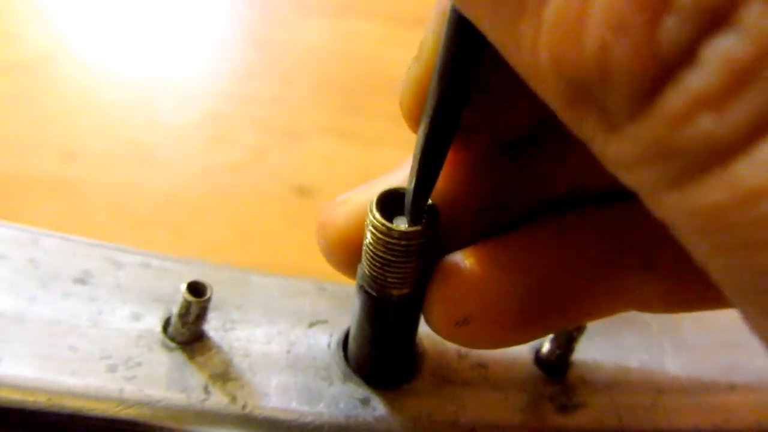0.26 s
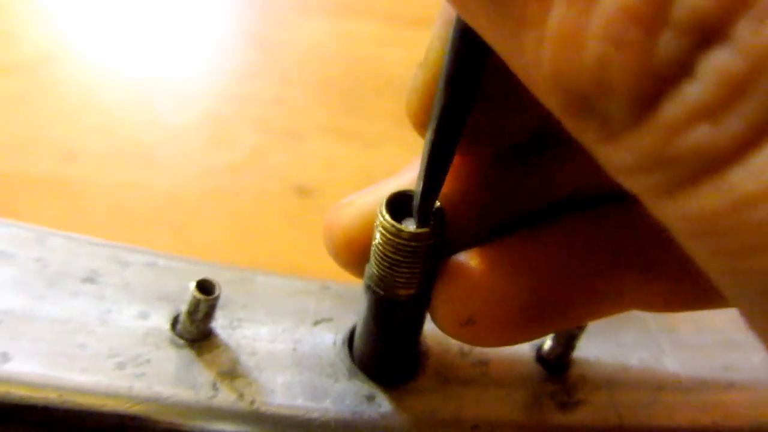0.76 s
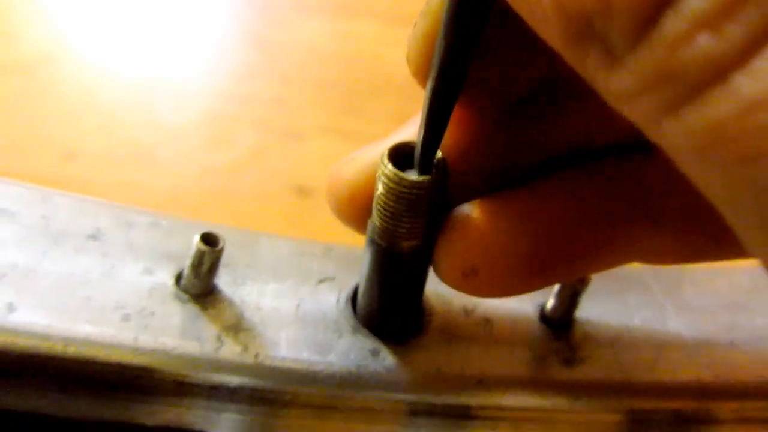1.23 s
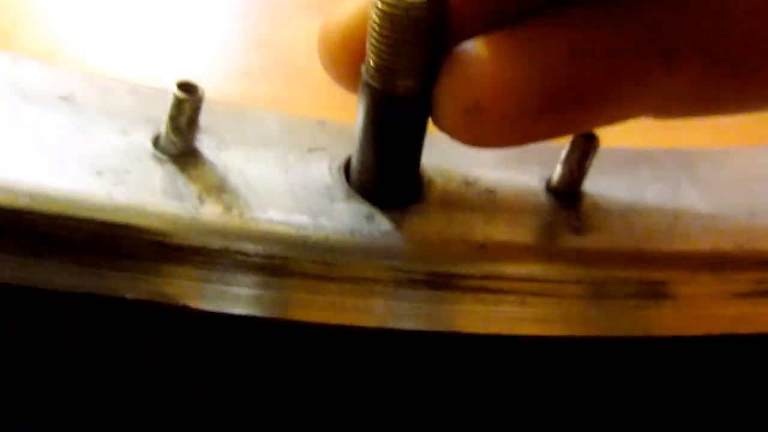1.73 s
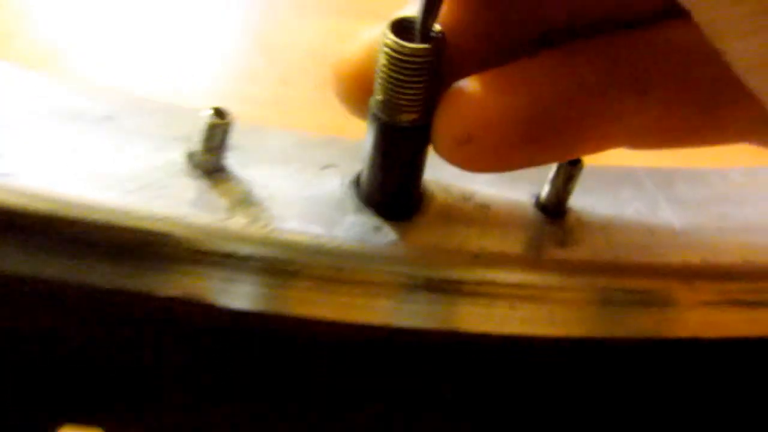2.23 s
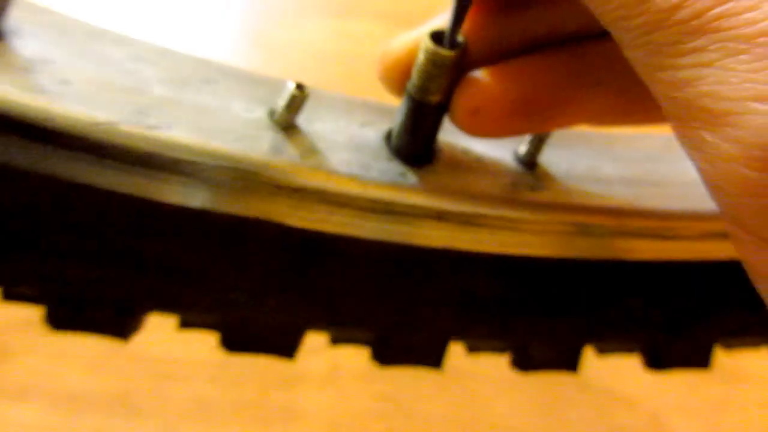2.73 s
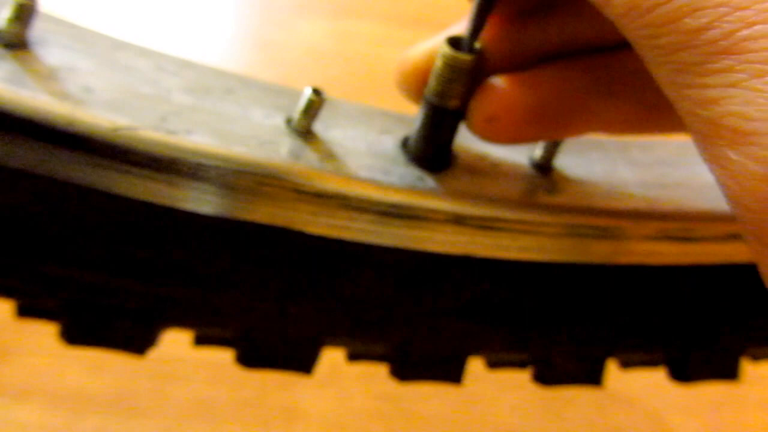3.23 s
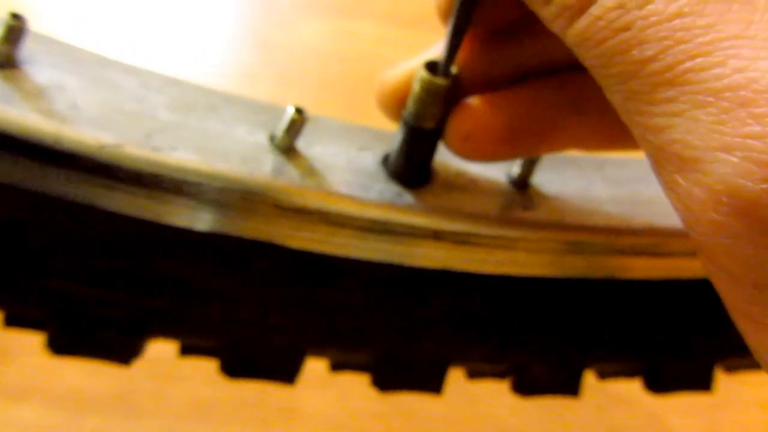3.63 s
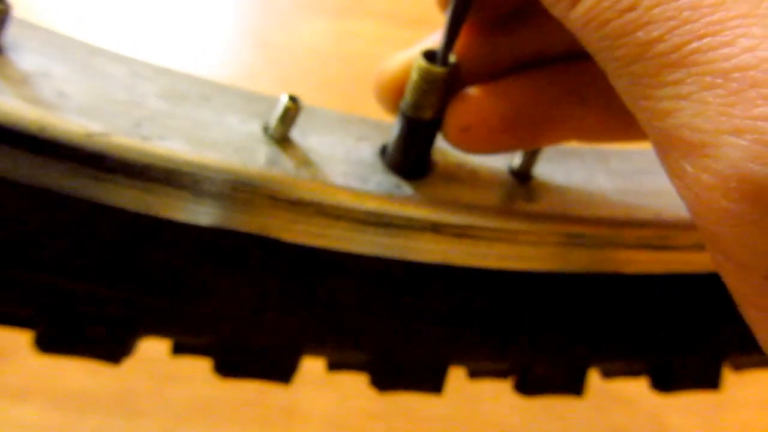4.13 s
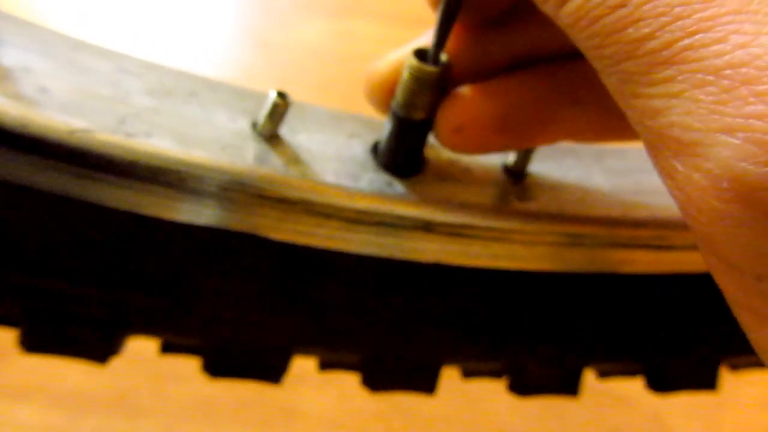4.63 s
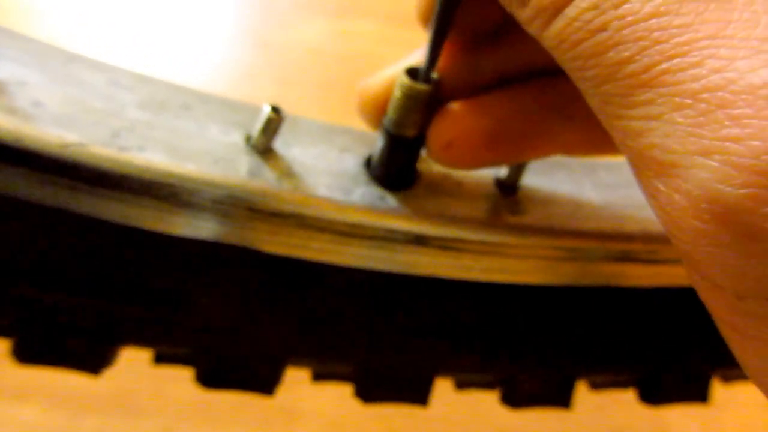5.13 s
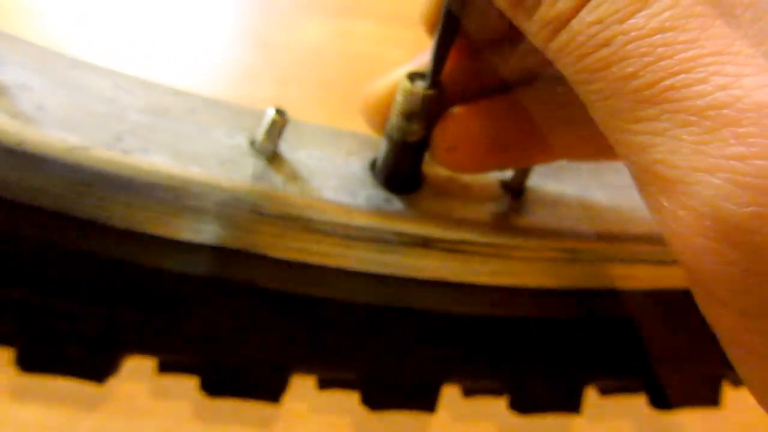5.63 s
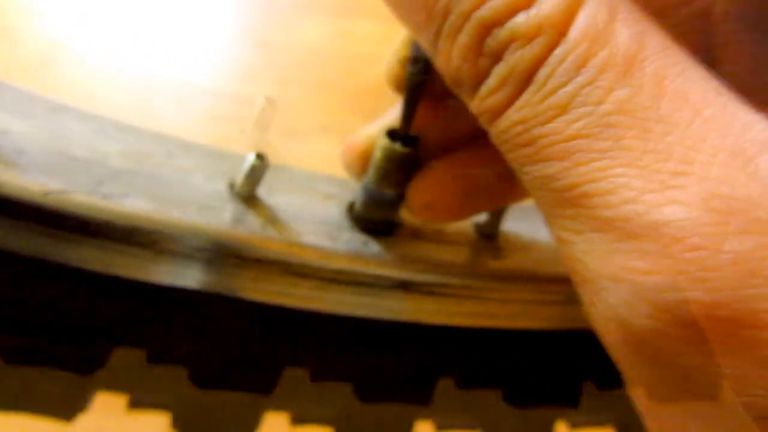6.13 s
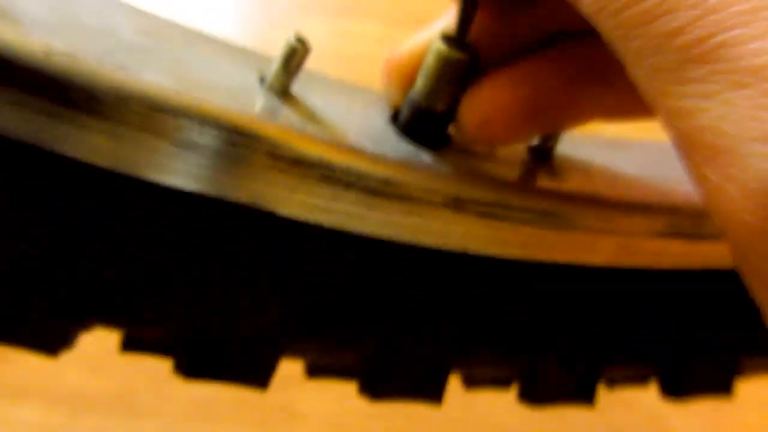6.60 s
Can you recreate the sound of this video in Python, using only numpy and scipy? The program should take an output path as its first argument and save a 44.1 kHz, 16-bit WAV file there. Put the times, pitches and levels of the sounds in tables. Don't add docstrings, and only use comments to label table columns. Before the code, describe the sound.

A continuous, high, fizzing rush of air from a small valve, heard up close indoors. At first heavy wind-like thumps and flutter batter the microphone; after about two seconds they thin to occasional puffs and the hiss dominates, building. A sharp click-like pop stops it for an instant. A softer, hollower leak follows, swelling briefly with faint metallic nudges, then dying down with a last little puff.

```python
import sys
import numpy as np
from scipy import signal
from scipy.fft import rfft, irfft, next_fast_len
from scipy.io import wavfile

SR = 44100
rng = np.random.default_rng(int(sys.argv[2]) if len(sys.argv) > 2 else 0)


def log_audio(samples):
    frames = np.atleast_2d(samples).T
    limited = np.clip(frames, -1, 1)
    pcm = np.round(limited * 32767).astype(np.int16)
    wavfile.write(sys.argv[1], SR, pcm)


def makeup_ratio(level_db):
    decades = np.asarray(level_db, float) / 20
    return 10 ** decades


N = 302658
SIZE = next_fast_len(N, True)
LOG_BINS = np.log(np.arange(SIZE // 2 + 1) * SR / SIZE + 1)

# frequency in Hz, level in dB per Hz.
FLOOR_COLOUR = [(30, -24), (120, -2.5), (300, -8.5), (700, -8), (2000, -25), (4000, -15), (8000, -25),
                (15000, -24)]
FLOOR_DB = -59
ROOM_T60_S, ROOM_DB, WALL_CUT_HZ = .7, -26, 5300

# time in seconds, hiss in dB.
JET_LEVEL = [(0.0, -31), (0.5, -31.5), (1.24, -31.5), (1.28, -33.3), (1.55, -32.5), (1.83, -30.5),
             (4.14, -24.5), (5.09, -23), (5.5, -22), (5.57, -52), (5.6, -45), (5.635, -33), (5.76, -32.5),
             (5.91, -29), (6.15, -27.5), (6.49, -29.5), (6.7, -35.5), (6.86, -40)]
# time in seconds, pose.
POSE = [(0, 0.0085), (1.2, 0.083), (2.0, 0.34), (3.0, 0.5), (4.0, 0.72), (4.7, 0.9), (5.502, 0.86),
        (5.506, 1.8), (5.75, 2.14), (5.95, 2.83), (6.3, 2.97), (6.5, 3.15), (6.65, 3.6), (6.86, 3.8)]
# time in seconds, open share 0-1.
VALVE_OPEN = [
    (0, 1),
    (5.5029, 1),
    (5.5037, 0),
    (5.57, 0),
    (5.6, 1),
    (6.86, 1),
]
SEEP_DB = -51.5
# time in seconds, share lost 0-1.
FINGER_SHADE = [(0, 0), (5.18, 0), (5.22, .5), (5.52, .5), (5.54, 0), (6.86, 0)]
SHADE_HZ = 12300
# frequency in Hz, level in dB per Hz.
SUM_HELD = [
    [(3000, -8), (3900, -6.5), (4620, -2), (5020, -0.5), (5990, 0.8), (7720, -2), (8490, -3.5),
     (10300, -7.5), (11000, -12), (12000, -20), (14300, -13.5), (15600, -10)],
    [(2240, -31), (3800, -19), (3960, -24.5), (4590, -13.5), (5200, -9.5), (5920, -12.5), (6740, -11.5),
     (7770, -8.5), (8640, -1), (9220, 0), (11200, -6), (12200, -9.5), (14200, -8.5), (14800, -13),
     (15600, -26)],
]
# frequency in Hz, level in dB per Hz.
SUM_LEAK = [
    [(2240, -22), (3800, -18), (5080, -11), (5480, -5.5), (6240, -10), (6700, -8), (8440, -13), (8790, -11),
     (10200, -4), (11600, -17), (13300, -17), (15600, -23)],
    [(2240, -27), (3800, -17), (4250, -8), (4700, -3), (5650, -5.5), (6170, -9.5), (7860, -10),
     (8640, -15.5), (9550, -9.5), (10200, -7.5), (10800, -9), (12000, -22), (13600, -17), (15600, -22)],
    [(2240, -66), (3800, -34), (4150, -12), (4560, -4), (4870, -9), (5290, -20), (5750, -23), (8240, -23),
     (8740, -18), (10400, -23), (12500, -35), (13900, -17), (15600, -46)],
]
SUM = SUM_HELD + SUM_LEAK
# frequency in Hz, level in dB per Hz.
DIFFERENCE = [
    [(2240, -40), (3800, -11), (5820, -1.5), (6980, -3), (8190, -6), (8850, -9), (11100, -13), (12000, -19),
     (13400, -22), (14400, -13), (15600, -18)],
    [(2240, -48), (3800, -21), (4460, -21), (5260, -6), (6280, -5), (7770, 3.5), (11100, -3.5),
     (12000, -10), (13200, -5), (15600, -17)],
    [(2240, -54), (3800, -14), (4430, -23), (5260, -2), (6240, -7), (7770, -2), (10100, -7), (11700, -17),
     (13400, -15), (15600, -22)],
    [(2240, -49), (3800, -19), (4510, -13), (5140, -4), (5480, 1), (6210, -10), (7590, -2), (8440, -11),
     (9610, -6), (11500, -19), (13300, -16), (14400, -20), (15600, -20)],
    [(2240, -64), (3800, -34), (4180, -24), (4460, -19), (6740, -28), (7810, -6), (8850, -4), (9780, 1),
     (11300, -5), (12800, -32), (13100, -18), (14100, -17), (15600, -33)],
]
# level in dB, by pose.
DIFFERENCE_DB = [-2, -1.5, -1.5, -2.5, -0.3]
# frequency in Hz, shared part 0-1,
# phase of the difference in radians.
COHERENCE = [(3000, .4, 3.5), (4400, 0.3, 2.2), (5360, 0.87, 2.27), (6960, 0.5, 0.93), (8250, 1, 1.56),
             (10000, 1, 1.2), (12000, .8, 1.6), (15000, .75, 1.1)]
# time in seconds, left minus right of the jet in dB, of the stream in dB.
LEAN = [(0, -1.5, -0.2), (1.4, 0, -.3), (2.16, -0.8, 1), (2.5, -1.3, -1.5), (4, -1.5, -2.5),
        (5.6, -2.6, -4), (5.96, -.3, -1), (6.65, -3.5, 0), (6.86, -3, -3)]

# time in seconds, strength in dB, aim at the ports 0-1,
# share coming as lone pops 0-1.
STREAM = [(0, 6.5, 0.22, 0.13), (.5, 4, 0.79, 0.41), (1.0, 1.3, 0.99, 0.58), (1.4, -1, 1, 0.52),
          (1.9, 0.4, 0.98, 0.53), (2.26, -0.5, 0.87, 0.8), (2.37, 0.15, 0.04, .3), (3.3, -1, 0.04, .2),
          (3.9, -2.5, .01, 0.42), (5.15, -9, 0.14, 0.63), (5.23, -13.5, .01, 0.7), (5.5, -10, .01, 0.3),
          (5.51, -26, 0.4, .4), (5.65, -31, 0.1, 0.36), (6.86, -24, 0.1, 0.4)]
# time in seconds, level in dB, half length in seconds.
GUSTS = [(0.12, 0, 0.022), (0.343, -3, 0.036), (0.544, 3.5, 0.051), (.6, 3, 0.017), (0.748, 0, 0.013),
         (0.834, 1, 0.034), (1.07, -0.5, 0.033), (1.15, 4, 0.021), (1.26, 2, .015), (1.285, -5, .015),
         (1.387, -4, 0.045), (1.462, 2, 0.024), (1.68, 5, .03), (1.977, -7, 0.013), (2.016, 0.5, .025),
         (2.1, 2, .025), (2.184, -11, 0.015), (2.196, 4, 0.0095), (2.335, 6, 0.0084), (3.957, 1.5, 0.034),
         (4.495, 8.5, 0.025), (4.872, 7.5, 0.022), (5.177, 9.5, .015), (6.06, 6, 0.029), (6.527, 7.5, .04),
         (6.744, 14, 0.046)]
GUSTY_DB, GUSTS_PER_S = 0.26, 6.5
# frequency in Hz, level in dB per Hz.
THUD = [(15, -30), (35, -12), (60, -6), (85, -1), (130, 2), (250, -29)]
# frequency in Hz, level in dB per Hz.
RUMBLE = [(30, -28), (75, -12), (120, -2.6), (200, 0), (350, -4), (700, -11.5), (2000, -64)]
# frequency in Hz, level in dB per Hz.
FLUTTER = [(150, -9), (350, -0.6), (700, 0.8), (1200, -2.5), (2500, -12), (5000, -62)]
# frequency in Hz, level in dB per Hz.
RUSH = [(500, -12), (1200, -2.5), (2000, -1.5), (2700, -1.5), (3400, -4), (3900, -9.5), (4600, -10),
        (8000, -28)]
# level in dB at strength 0, dB per dB of strength, dB added by full aim,
# share of a gust, level in dB against the bore.
STREAM_LAWS = [
    (-56.5, 1, 22.5, 1.03, -45),
    (-41.5, 1.5, 12, 0.88, -23.5),
    (-34, 1.45, 2.2, 0.57, -17),
    (-31.5, 0.89, -0.8, 0.17, -28),
]
# colour, difference in dB on the ports, popping factor 0-1.
STREAM_LAYERS = [(THUD, 9.1, .5), (RUMBLE, 9.1, .95), (FLUTTER, 3.1, .8), (RUSH, -1.1, .3)]
PORT_SHARE, PORT_SHARE_AIMED, PORT_SHARE_LEAK = 0.78, 0.13, .3

# frequency in Hz, level in dB per Hz.
BORE_SUM = [(260, -46), (450, -17), (516, -16), (643, -6.5), (786, -7.5), (910, -5), (1360, -1.5),
            (1810, -1.5), (2110, -5.5), (2930, -4.5), (3680, -7.5), (4000, -20), (5200, -36), (8800, -120)]
# frequency in Hz, level in dB per Hz.
BORE_DIFFERENCE = [(450, -20), (900, -26), (1350, -10), (1900, -13), (2600, -2), (3500, -2.1), (4300, -11),
                   (5000, -40)]
BORE_DB, BORE_DB_PER_POSE = -8, 10.5
BORE_DULL_HZ, BORE_DULLING = 1900, .6
BORE_PUFF_S, BORE_PUFF_DB, BORE_PUFF_HALF_S = 6.735, 5, 0.027

SNAP_S, SNAP_DB = 5.50276, -8
SNAP_PUSH_S, SNAP_VENT_HZ = 0.00028, 620
# frequency in Hz, level in dB, t60 in seconds.
SNAP_MODES = [(327, -12, 0.016), (2300, -21, 0.0078), (155, -32.5, 0.13)]
# time in seconds, peak in dB.
TAPS = [
    (5.974, -28),
    (6.073, -36),
]
# frequency in Hz, level in dB, t60 in seconds.
TAP_MODES = [(440, -3, 0.021), (580, 1, 0.017), (770, -11, .025), (1000, -6, .02)]
LIMIT = .68


def rms_one(x):
    return x / np.sqrt(np.mean(x ** 2) + 1e-20)


def in_time(rows):
    s, *columns = np.transpose(rows)
    return [np.interp(np.arange(N) / SR, s, c) for c in columns]


def gains(spectrum):
    hz, db = np.transpose(spectrum)
    below = np.maximum(np.log(hz[0]) - LOG_BINS, 0)
    return makeup_ratio(np.interp(LOG_BINS, np.log(hz), db, right=-90) - 40 * below)


def white(strength=1):
    return rfft(rng.standard_normal(N) * strength, SIZE)


def coloured(spectrum, source):
    return rms_one(irfft(source * gains(spectrum), SIZE)[:N])


def high_pass(x, hz):
    return signal.sosfilt(signal.butter(2, hz, "high", fs=SR, output="sos"), x)


def treble(x, hz):
    return signal.sosfiltfilt(signal.butter(2, hz, "high", fs=SR, output="sos"), x)


def drift(rate):
    r = np.exp(-2 * np.pi * rate / SR)
    wander = signal.lfilter([1], [1, -2 * r, r * r], rng.standard_normal(N + SR))
    return rms_one(wander[SR:])


def ports(total, difference):
    return np.array([total + difference, total - difference])


def struck(events, modes):
    clicks = np.full(N, 1e-18)
    for s, db in events:
        clicks[round(s * SR)] = makeup_ratio(db)
    out = 0
    for hz, db, t60 in modes:
        r = makeup_ratio(-60 / (t60 * SR))
        w = 2 * np.pi * hz / SR
        out = out + signal.lfilter([0, makeup_ratio(db) * np.sin(w)], [1, -2 * r * np.cos(w), r * r], clicks)
    return out


def noise_floor():
    return makeup_ratio(FLOOR_DB) * ports(coloured(FLOOR_COLOUR, white()), 0.99 * coloured(FLOOR_COLOUR, white()))


def room(x):
    t = np.arange(SR) / SR
    tail = rng.standard_normal((2, len(t))) * makeup_ratio(-60 * t / ROOM_T60_S) * np.clip(t / 0.0019, 0, 1)
    tail = signal.sosfilt(signal.butter(1, WALL_CUT_HZ, fs=SR, output="sos"), tail)
    tail = tail / np.sqrt(np.sum(tail ** 2) / 2)
    return makeup_ratio(ROOM_DB) * signal.fftconvolve(x[None], tail, axes=1)[:, :N]


def taps():
    return high_pass(high_pass(struck(TAPS, TAP_MODES), 330.0), 330.0)


def snap():
    late = np.arange(N) / SR - SNAP_S
    push = makeup_ratio(SNAP_DB + 5.5) * np.sin(np.pi * np.clip(late / SNAP_PUSH_S, 0, 1)) ** 2
    return high_pass(push, SNAP_VENT_HZ) + struck([(SNAP_S, SNAP_DB)], SNAP_MODES)


def after_snap():
    return np.clip((np.arange(N) / SR - VALVE_OPEN[3][0]) / .2, 0, 1)


def bore_db():
    (hiss_db,), (pose,) = in_time(JET_LEVEL), in_time(POSE)
    return hiss_db + BORE_DB - BORE_DB_PER_POSE * np.maximum(len(SUM) - 2 - pose, 0)


def bore():
    breath = ports(coloured(BORE_SUM, white()), makeup_ratio(-10.5) * coloured(BORE_DIFFERENCE, white()))
    top = treble(breath, BORE_DULL_HZ)
    lost = np.clip(BORE_DULLING * (in_time(POSE)[0] - (len(SUM) - 2)), 0, 1)
    puff_db = BORE_PUFF_DB * np.exp(-((np.arange(N) / SR - BORE_PUFF_S) / BORE_PUFF_HALF_S) ** 2)
    return after_snap() * makeup_ratio(bore_db() + puff_db) * (breath - lost * top)


def eddies(per_s, spread_db, size_cap):
    born = rng.random(N) < per_s * makeup_ratio(3.1 * drift(25.0)) / SR
    return rms_one(born * makeup_ratio(spread_db * np.minimum(rng.exponential(1, N), size_cap)))


def stream():
    strength_db, aim, popping = in_time(STREAM)
    aim, popping = np.clip(aim, 0, 1), np.clip(popping, 0, 1)
    late, breath_db = after_snap(), bore_db()
    on_ports = (PORT_SHARE + PORT_SHARE_AIMED * aim) * (1 - late) + PORT_SHARE_LEAK * late
    on_ports = np.clip(on_ports, 0, 1)
    gust_db = sum(db * np.exp(-((np.arange(N) / SR - s) / half) ** 2) for s, db, half in GUSTS)
    gust_db = gust_db + GUSTY_DB * drift(GUSTS_PER_S)
    pops = eddies(per_s=500.0, spread_db=3.5, size_cap=2.23)
    out = 0
    for (colour, apart_db, poppy), law in zip(STREAM_LAYERS, STREAM_LAWS):
        db, follows, aimed_db, gusty, leak_db = law
        share = np.clip(popping * poppy, 0, 1)
        strength = np.sqrt(1 - share + share * pops ** 2)
        total = coloured(colour, white(strength))
        apart = coloured(colour, white(strength))
        sound = ports(total, makeup_ratio(apart_db) * on_ports * apart)
        level = makeup_ratio(db + follows * strength_db + aimed_db * aim) + late * makeup_ratio(breath_db + leak_db)
        out = out + level * makeup_ratio(gusty * gust_db) * sound
    return out


def jet():
    (hiss_db,), (pose,), (is_open,), (shade,) = map(in_time, (JET_LEVEL, POSE, VALVE_OPEN, FINGER_SHADE))
    hz, same, turn = np.transpose(COHERENCE)
    same = np.clip(np.interp(LOG_BINS, np.log(hz), same), 0, 1) * .88
    turn = np.exp(1j * np.interp(LOG_BINS, np.log(hz), turn))
    source = white()
    apart = same * turn * source + np.sqrt(1 - same ** 2) * white()
    out = 0
    for k in range(len(SUM)):
        share = np.clip(1 - np.abs(pose - k), 0, 1)
        difference = makeup_ratio(DIFFERENCE_DB[k]) * coloured(DIFFERENCE[k], apart)
        out = out + share * ports(coloured(SUM[k], source), difference)
    level = is_open * makeup_ratio(hiss_db) + (1 - is_open) * makeup_ratio(SEEP_DB)
    return level * makeup_ratio(.5 * drift(16.5)) * (out - shade * treble(out, SHADE_HZ))


def scene():
    jet_lean, stream_lean = (makeup_ratio(np.array([db, -db]) / 2) for db in in_time(LEAN))
    knocks = high_pass(snap(), 90.0) + taps()
    air = (jet() + bore()) * jet_lean + stream() * stream_lean
    knocks_at_ports = knocks * makeup_ratio(np.array([[-.8], [.8]]))
    return air + knocks_at_ports + room(air[1] + 0.25 * knocks) + noise_floor()


def low_pass(x):
    return signal.sosfilt(signal.butter(12, 15750, fs=SR, output="sos"), x)


def record(dry):
    mix = dry / (1 + (dry / LIMIT) ** 4) ** (1 / 4)
    return low_pass(mix)


dry = scene()
out = record(dry)
log_audio(out)
```